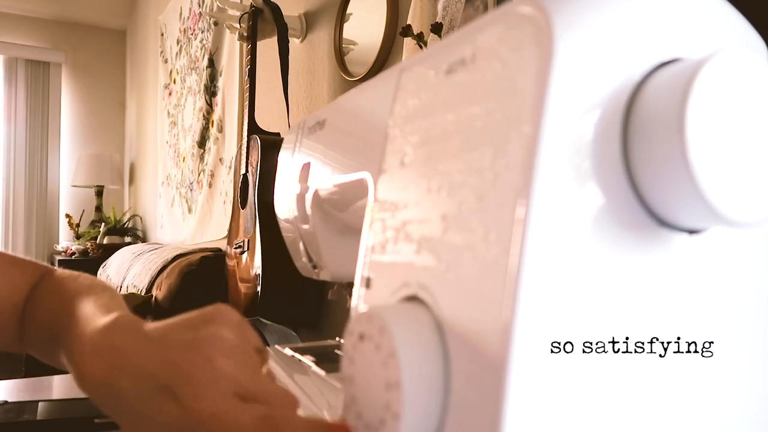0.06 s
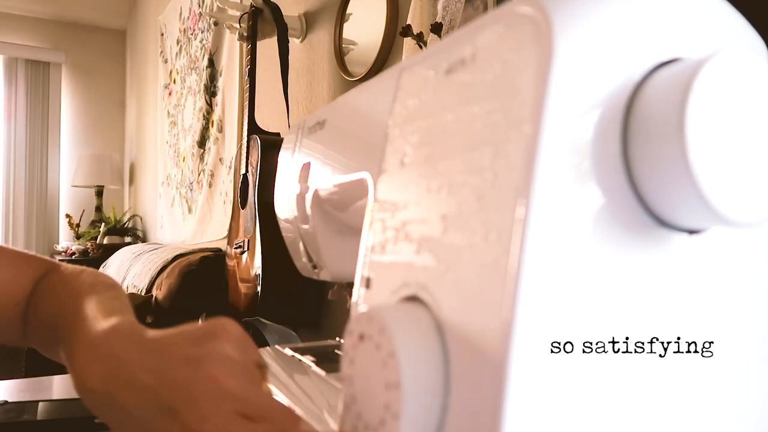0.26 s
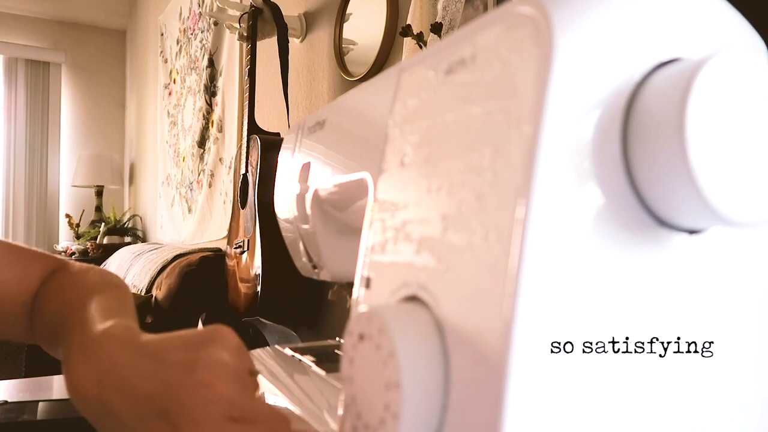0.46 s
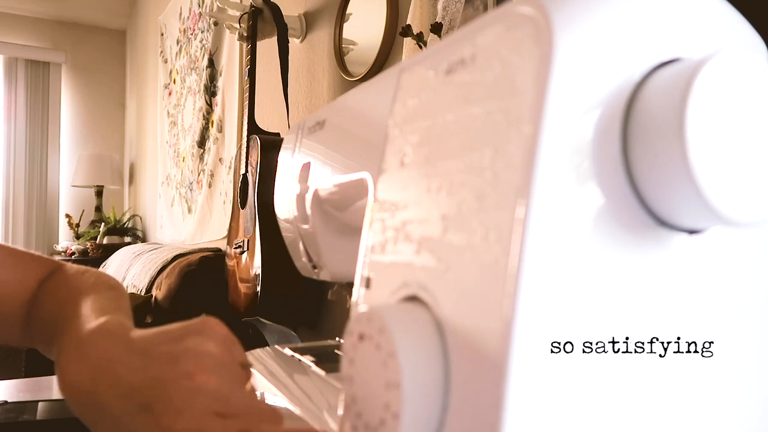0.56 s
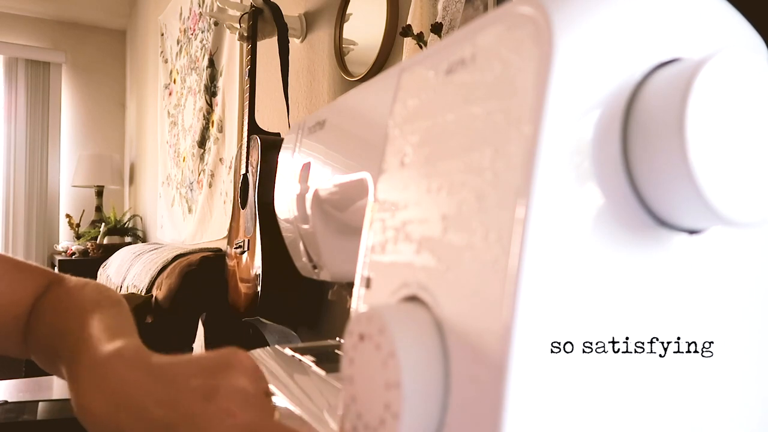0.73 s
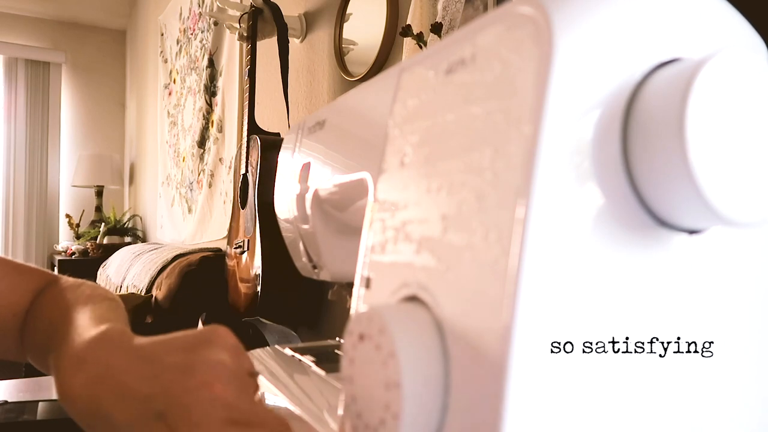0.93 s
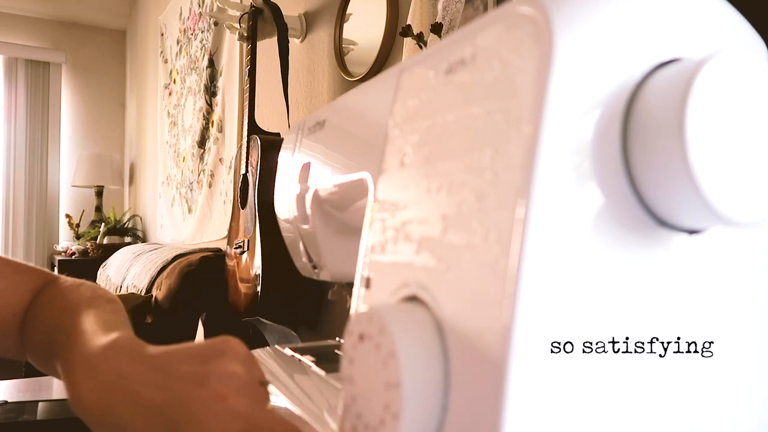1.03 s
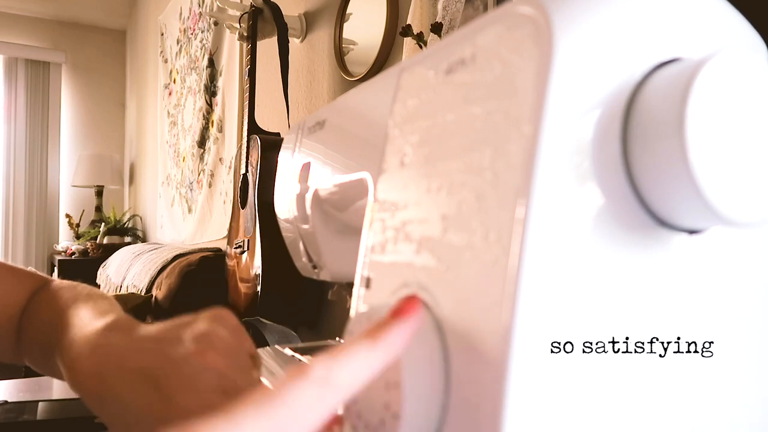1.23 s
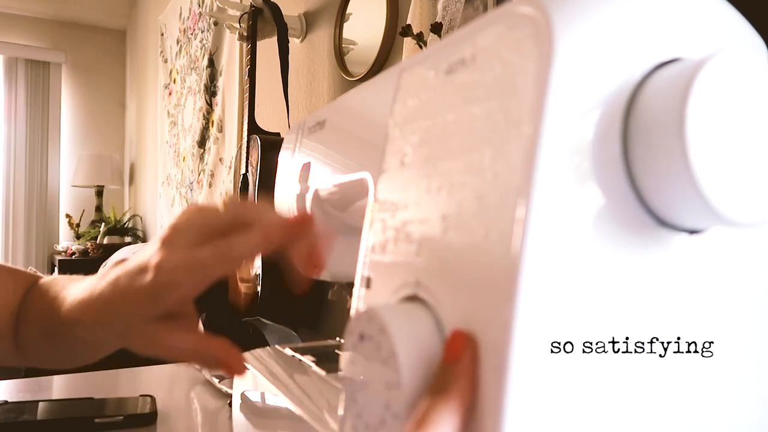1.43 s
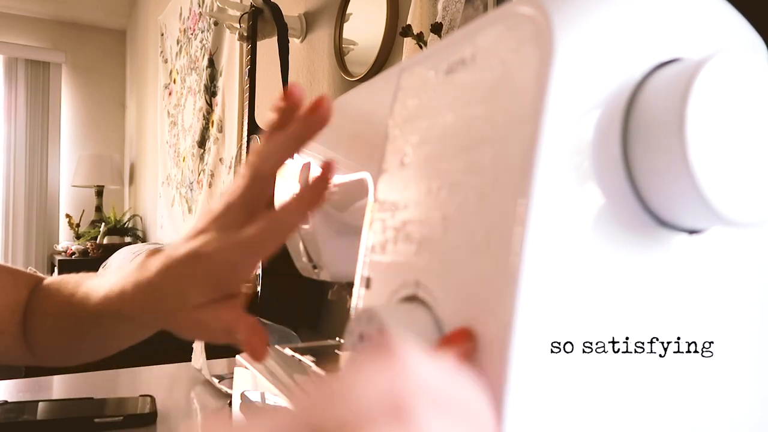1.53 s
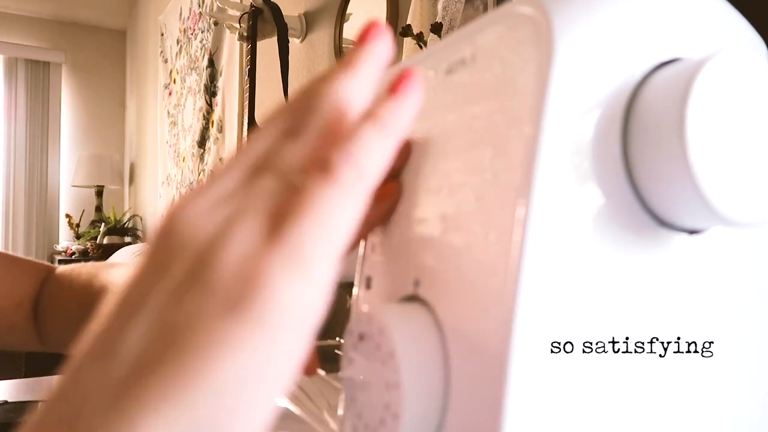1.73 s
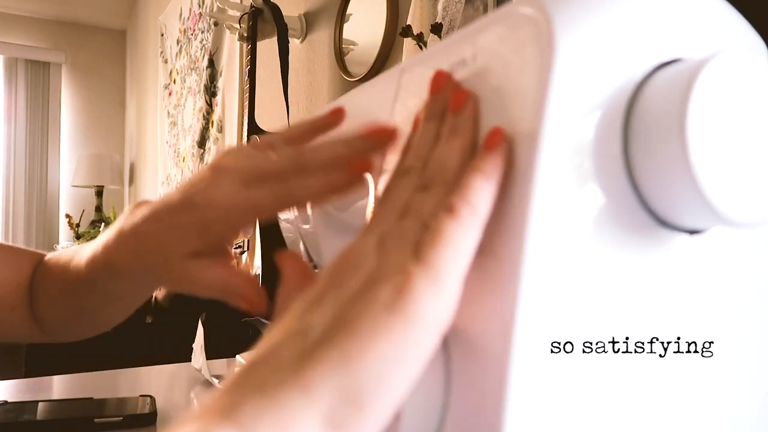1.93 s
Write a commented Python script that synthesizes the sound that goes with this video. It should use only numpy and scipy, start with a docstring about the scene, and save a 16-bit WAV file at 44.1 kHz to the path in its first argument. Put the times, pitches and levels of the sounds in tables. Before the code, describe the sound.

Sticky fingertip taps on a hollow plastic casing, heard close in stereo in a quiet room. After faint scuffs, a tap lands at 0.2 s, glue crackles from 0.33 and pops at 0.45. A softer tap at 0.67 peels to a pop at 0.87; another crackle pops at 1.2. A dull tap follows at 1.34, then light skin scuffs around 1.67 over faint low rumble.

```python
"""Faint skin scuffs in a quiet room, then fingertips tap a hollow plastic casing coated with tacky glue.
Each pull-off crackles and tugs at the casing, then lets go with a pop, close to a small stereo microphone.
Noise bursts and random thread breaks ring a thin panel; force pulses ring the casing.
Room echo, filtered room noise, a late rumble and a thin steady tone lie underneath."""
import sys
import numpy as np
from scipy import signal
from scipy.fft import rfft, irfft
from scipy.io import wavfile

SR = 44100
rng = np.random.default_rng(int(sys.argv[2]) if len(sys.argv) > 2 else 0)


def transcribe(u):
    """Save the signal u as a 16-bit wav file named by the first command-line argument.

    u: samples, shape (n,) or (channels, n), limited to [-1, 1]; the rate is SR.
    q: integer samples, one column per channel.
    """
    v = np.clip(np.atleast_2d(u).T, -1, 1)
    q = np.round(v * 32767).astype(np.int16)
    wavfile.write(sys.argv[1], SR, q)


def gain_from_decibels(decibels):
    """Convert decibel values to linear amplitude factors."""
    exponent = np.asarray(decibels, float) / 20
    return 10 ** exponent


N = 85995


def evened(x):
    """Scale to unit rms."""
    return x / np.sqrt(np.mean(x ** 2) + 1e-20)


def unit_energy(x):
    """Scale to unit energy."""
    return x / np.linalg.norm(x)


def read(points, hz):
    """Interpolate (Hz, value) points over log frequency."""
    point_hz, value = np.transpose(points)
    return np.interp(np.log(hz + 1), np.log(point_hz + 1), value)


def conv(a, b):
    """Convolve, cut to the scene length."""
    return signal.fftconvolve(a, b)[:N]


def colour(points):
    """Causal minimum-phase filter of unit energy with the given spectrum."""
    hz = abs(np.fft.fftfreq(4096, 1 / SR))
    log_gain = np.log(gain_from_decibels(np.maximum(read(points, hz), -100)))
    spectrum = np.exp(np.conj(signal.hilbert(log_gain)))
    return unit_energy(np.fft.ifft(spectrum).real[:2048])


def spikes(rows, col):
    """One impulse per row, its level in dB taken from column col."""
    out = np.zeros(N)
    for row in rows:
        out[round(row[0] * SR)] += gain_from_decibels(row[col])
    return out


# Room tone spectrum, sum of the channels. Each row: frequency in Hz, relative level in dB.
AIR_MID = [(26, 0), (45, -9.5), (216, -3.5), (362, -8.5), (668, -19.5), (1830, -23.5), (2330, -25),
           (2910, -27), (12700, -47), (15800, -64)]
# Room tone spectrum, difference of the channels. Each row: frequency in Hz, relative level in dB.
AIR_SIDE = [(12, -91), (20, -78), (110, -14), (554, -15), (1250, -21.5), (1350, -20.5), (2960, -25),
            (12600, -37), (15800, -78.5)]
# Swell of the late low rumble. Each row: time in seconds, rms level in dB.
RUMBLE_SWELL = [(1.5, -106), (1.68, -47), (1.95, -48.5)]


def air(points, rms_db):
    """Steady noise shaped to a spectrum."""
    gain = gain_from_decibels(read(points, np.fft.rfftfreq(N, 1 / SR)))
    noise = irfft(rfft(rng.standard_normal(N)) * gain, N)
    return gain_from_decibels(rms_db) * evened(noise)


def rumble():
    """Band-passed noise that swells late."""
    band_hz = (74, 250)
    band = signal.butter(2, band_hz, "band", fs=SR, output="sos")
    noise = evened(signal.sosfilt(band, rng.standard_normal(N)))
    return noise * gain_from_decibels(np.interp(np.arange(N) / SR, *np.transpose(RUMBLE_SWELL)))


def room_tone():
    """Steady noise in sum and difference, the rumble in the sum, a thin steady sine in both."""
    whine_hz, whine_mid_rms_db, whine_side_rms_db = 13007, -88.5, -84
    tone = np.sqrt(2) * np.sin(2 * np.pi * whine_hz * np.arange(N) / SR)
    mid = air(AIR_MID, rms_db=-50) + rumble() + gain_from_decibels(whine_mid_rms_db) * tone
    side = air(AIR_SIDE, rms_db=-60.5) + gain_from_decibels(whine_side_rms_db) * tone
    return np.array([mid, side])


# Decay of the room. Each row: frequency in Hz, t60 in seconds.
ROOM_T60 = [(400, .3), (1200, .24), (3000, .18), (8000, .14)]


def room(x):
    """Two noise tails, sum and difference, each band dying at its own speed."""
    sum_db, side_below_sum_db = -14, -14
    low_cut_hz = 600  # echo tail kept above this; the casing modes carry the low decay
    hz, t, bands = signal.stft(rng.standard_normal((2, SR // 2)), SR, nperseg=256)
    decay = gain_from_decibels(-60 * t / read(ROOM_T60, hz)[:, None])
    tails = signal.istft(bands * decay, SR, nperseg=256)[1]
    tails = signal.lfilter(*signal.butter(2, low_cut_hz, "high", fs=SR), tails)
    tails *= np.clip(np.arange(tails.shape[1]) / SR / 0.0074 - .5, 0, 1)  # silent 3.7 ms, full at 11.1 ms
    echo = np.array([conv(x, unit_energy(tail)) for tail in tails])
    return echo * gain_from_decibels(sum_db) * gain_from_decibels(np.array([[0], [side_below_sum_db]]))


# Hollow body modes, and a faint long low hum near 120 Hz. Each row: frequency in Hz,
# relative level in dB when pulled, the same when tapped, t60 in seconds,
# signed amplitude factor giving the direction of the first swing.
BODY_RING = [(117, -38.5, -26, 0.63, 0.2), (212.4, -16, -12.5, 0.32, -0.17),
             (244.9, -20.5, -18.5, 0.9, 0.152), (302, -3, -0.5, 0.078, -0.83),
             (303.3, -14.5, -14, 0.22, 0.76), (357, -4.5, -7.5, 0.11, 0.59), (389, -6, -3, 0.069, 0.8),
             (471, -16, -10, 0.083, 0.46), (586.5, -21.5, -17.5, 0.03, -1.9),
             (694.4, -18.5, -5, 0.036, 0.95)]


def body(col):
    """Ring of the hollow casing as decaying cosines for one place of contact, peak 1."""
    t = np.arange(SR // 2) / SR
    ring = np.zeros(len(t))
    for row in BODY_RING:
        hz, t60_s, swing = row[0], row[3], row[4]
        ring += swing * gain_from_decibels(row[col] - 60 * t / t60_s) * np.cos(2 * np.pi * hz * t)
    return ring / abs(ring).max()


def pulled_body():
    """Casing ring under a pulling finger."""
    return body(col=1)


# Thin panel modes. Each row: frequency in Hz, relative level in dB.
PANEL_MODES = [(1265, 0), (1710, -1), (2140, -1), (2880, 4.5), (3420, -5), (3990, -8)]


def panel():
    """Ring of the thin panel as decaying sines, low-passed, unit energy."""
    t60_s, top_hz = .022, 5000
    t = np.arange(SR // 8) / SR
    ring = sum(gain_from_decibels(db - 60 * t / t60_s) * np.sin(2 * np.pi * hz * t) for hz, db in PANEL_MODES)
    return unit_energy(signal.lfilter(*signal.butter(4, top_hz, fs=SR), ring))


SKIN_RING_DB = -11  # panel ring against bare noise: a resting finger damps the panel


def surface(points, ring_db):
    """Bare broadband snap plus the panel modes, unit energy."""
    out = gain_from_decibels(ring_db) * panel()
    out[:2048] += colour(points)
    return unit_energy(out)


JOLT_S, TUG_S = 0.0006, 0.0022  # lengths of contact


def push(length_s, lag_s=0):
    """A smooth sin-squared force pulse of unit area."""
    u = (np.arange(SR // 40) / SR - lag_s) / length_s
    shape = np.sin(np.pi * np.clip(u, 0, 1)) ** 2
    return shape / shape.sum()


def hits(rows, length_s, points, ring_db):
    """A short burst of noise with a grainy, duller after-crackle into the surface."""
    rise_s = 0.00045
    after_db, after_decay_s, after_top_hz = -13, 0.02, 2000
    t = np.arange(SR // 10) / SR
    strikes = spikes(rows, col=1)
    envelope = np.minimum(t / rise_s, 1) * np.exp(-(t / length_s) ** 2)
    burst = conv(strikes, envelope) * rng.choice([-1., 1.], N)
    grain_db = 0.54 * rng.exponential(1, N // 40 + 1).repeat(40)[:N]  # held for 40 samples
    grain = rng.standard_normal(N) * gain_from_decibels(grain_db)
    dull_grain = signal.lfilter(*signal.butter(1, after_top_hz, fs=SR), grain)
    burst += conv(strikes, gain_from_decibels(after_db) * np.exp(-t / after_decay_s)) * dull_grain
    return conv(burst, surface(points, ring_db))


def jolts(rows, contacts_s, ring, lag_s, rebound_db):
    """Each hit pushes the body once, again as the wall swings back; longer contact sounds duller."""
    rebound_s = 0.01722
    force = np.zeros(N)
    rebound = gain_from_decibels(rebound_db) * push(TUG_S, lag_s + rebound_s)
    for row, contact_s in zip(rows, contacts_s):
        force += conv(spikes([row], col=2), push(contact_s, lag_s) + rebound)
    return -conv(force, ring)


def strokes(rows, points, ring_db, edge_s):
    """Glue threads break at random, a few of them large; the drag also shakes the body."""
    threads_per_s, spread_db = 3000, 3.4
    t, level, shake = np.arange(N) / SR, np.zeros(N), np.zeros(N)
    for start, end, first_db, last_db, shake_db in rows:
        gate = np.clip(np.minimum(t - start, end - t) / edge_s, 0, 1)
        now = gate * gain_from_decibels(np.interp(t, [start, end], [first_db, last_db]))
        level += now
        shake += now * gain_from_decibels(shake_db)
    size = gain_from_decibels(spread_db * np.minimum(rng.exponential(1, N), 5)) * rng.choice([-1., 1.], N)
    threads = evened(size * (rng.random(N) < threads_per_s / SR))
    tearing = conv(level * threads, surface(points, ring_db))
    shaking = conv(conv(shake * threads, push(JOLT_S)), unit_energy(pulled_body()))
    return tearing + shaking


# Sliding skin spectrum. Each row: frequency in Hz, relative level in dB.
SCUFF = [(500, -1), (900, -5.5), (1900, 1), (2600, -4.5), (4200, -7.5), (5200, -17), (9000, -30),
         (15500, -47)]
# Skin sliding over the coat. Each row: start in seconds, end in seconds, first level in dB,
# last level in dB, shake of the casing in dB over that level.
SLIDES = [(-.02, .07, -72, -84, 36.5), (.125, .225, -53, -40, 9), (.56, .68, -60.5, -52.5, 13),
          (.96, 1.05, -58, -53, 17), (1.458, 1.495, -57, -59, 1), (1.6, 1.675, -65, -51.5, -6),
          (1.66, 1.715, -34, -50, -7.5), (1.71, 1.79, -53, -55, 12.5), (1.84, 1.97, -62.5, -53.5, -11)]


def slides():
    """Sliding skin breaks glue threads against a finger-damped panel."""
    return strokes(SLIDES, SCUFF, SKIN_RING_DB, edge_s=.014)


# Light brushes of skin on the coat. Each row: time in seconds, click level in dB.
BRUSHES = [(1.0, -52.5), (1.438, -57), (1.467, -46.5), (1.525, -56.5), (1.635, -45.5), (1.6655, -37),
           (1.6743, -29), (1.931, -60)]


def brushes():
    """Very short scuff bursts, no jolt."""
    return hits(BRUSHES, 0.0028, SCUFF, SKIN_RING_DB)


# Soft tugs at the casing; the last row is the wall swinging back after the tug before it. Each row: time in
# seconds, jolt level in dB.
TUGS = [(0.177, -20.5), (0.393, -14.5), (0.409, -10), (0.422, -11), (0.431, -15), (0.438, -1.5),
        (0.631, -35), (0.817, -19), (0.843, -15), (0.853, -16), (1.019, -19.5), (1.133, -27.5),
        (1.168, -28), (1.182, -14), (1.285, -27), (1.424, -33.5), (1.682, -24), (1.742, -37.5),
        (1.754, -23), (1.7712, -32)]


def tugs():
    """Slow force pulses ring the body without a click."""
    return conv(conv(spikes(TUGS, col=1), push(TUG_S)), pulled_body())


# Fingertip on plastic, spectrum. Each row: frequency in Hz, relative level in dB.
CLICK = [(600, -13), (1200, 4), (1700, -6), (2450, -3), (3300, -13), (4500, -18), (6400, -24.5),
         (9800, -58), (15500, -56.5)]
# Fingertips land. Each row: time in seconds, click level in dB, jolt level in dB, contact in seconds.
TAPS = [(0.2114, -22, -3.5, .0005), (0.6658, -29, -9, 0.0011), (1.3361, -36, -7, 0.0018)]


def taps():
    """A landing finger clicks, then jolts the body, with a weak rebound."""
    contacts_s = [row[-1] for row in TAPS]
    clicks = hits(TAPS, 0.012, CLICK, SKIN_RING_DB)
    return clicks + jolts(TAPS, contacts_s, body(col=2), lag_s=0.001885, rebound_db=-14.5)


# Tearing threads, spectrum. Each row: frequency in Hz, relative level in dB.
CRACKLE = [(500, 8), (900, 7), (1730, 5), (2900, -1), (4200, -57), (5000, -20.5), (7500, -13.5),
           (9500, -51.5), (13800, -52), (15500, -63)]
# Glue tearing as a finger pulls off. Each row: start in seconds, end in seconds, first level in dB,
# last level in dB, shake of the casing in dB over that level.
PEELS = [(.326, .368, -41, -42.5, 12), (.358, .452, -39, -34, 10), (.786, 0.874, -45, -41.5, 6),
         (1.127, 1.197, -46.5, -35.5, 11.5)]


def peels():
    """Tearing threads crackle with a strong panel ring."""
    return strokes(PEELS, CRACKLE, ring_db=-1.5, edge_s=.006)


# Snap of glue, spectrum. Each row: frequency in Hz, relative level in dB.
CRACK = [(600, -7), (1000, 0), (1600, 6), (2900, -3), (4200, -7.5), (5200, -19), (7800, -23),
         (10000, -40.5), (13500, -43), (15500, -69)]
# Glue lets go. Each row: time in seconds, crack level in dB, jolt level in dB, panel knock level in dB.
POPS = [(.4506, -19, -1.5, 11), (.8745, -22.5, -4.5, 1), (1.1975, -20.5, -2, -9.5)]


def knocks():
    """Each snap sets the panel ringing once, cleanly, after a moment to ring up."""
    rise_s = .0014
    ring = panel()
    ring_up = 1 - np.exp(-np.arange(len(ring)) / SR / rise_s)
    return conv(spikes(POPS, col=3), ring * ring_up)


def pops():
    """Glue lets go: a crack, a panel knock and a body jolt that follows the snap."""
    cracks = hits(POPS, 0.006, CRACK, ring_db=-16)
    body_jolts = jolts(POPS, [JOLT_S] * len(POPS), pulled_body(), lag_s=0.00075, rebound_db=-13.5)
    return knocks() + cracks + body_jolts


# Difference over sum for the near casing. Each row: frequency in Hz, ratio in dB.
PORT_RATIO = [(60, -16), (110, -34), (200, -28.5), (380, -18), (700, -32), (1290, -20), (2380, -17.5),
              (4400, -3), (8120, 0.5), (15000, 2.5)]
# Phase of the difference. Each row: frequency in Hz, phase in radians.
PORT_PHASE = [(300, 1.8), (1500, 2.3), (4000, 1.75), (9000, 1.56)]


def port_difference(near):
    """Channel difference of the near casing: gain and phase set per frequency."""
    hz = np.fft.rfftfreq(N, 1 / SR)
    turn = np.exp(1j * read(PORT_PHASE, hz))
    return irfft(rfft(near) * gain_from_decibels(read(PORT_RATIO, hz)) * turn, N)


def scene():
    """Casing, room and room tone as sum and difference, turned into left and right."""
    near = slides() + brushes() + tugs() + taps() + peels() + pops()
    mid, side = np.array([near, port_difference(near)]) + room(near) + room_tone()
    return np.array([mid + side, mid - side])


def band_limit(x):
    """A steep low-pass at the top of the band."""
    return signal.sosfilt(signal.butter(12, 16430, fs=SR, output="sos"), x)


def record(dry):
    """Pass the finished stereo mix through the last stage."""
    return band_limit(dry)


dry = scene()
out = record(dry)
transcribe(out)
```